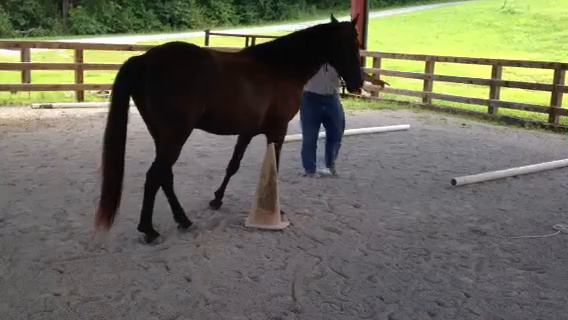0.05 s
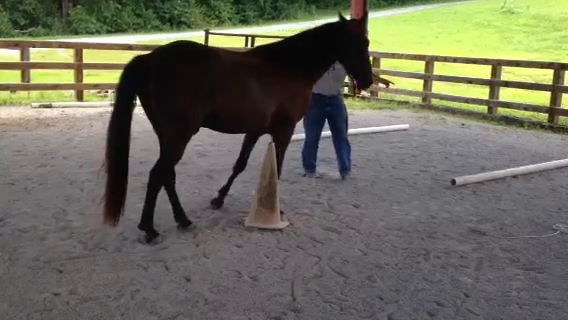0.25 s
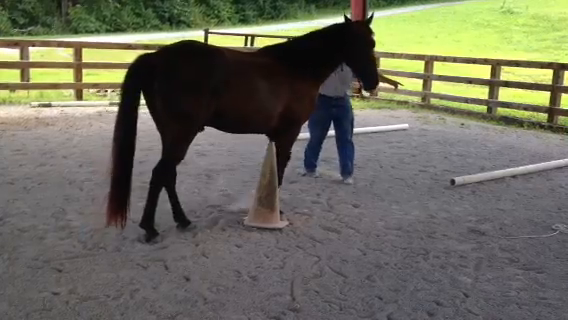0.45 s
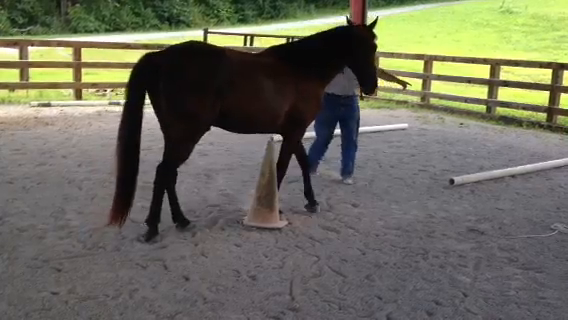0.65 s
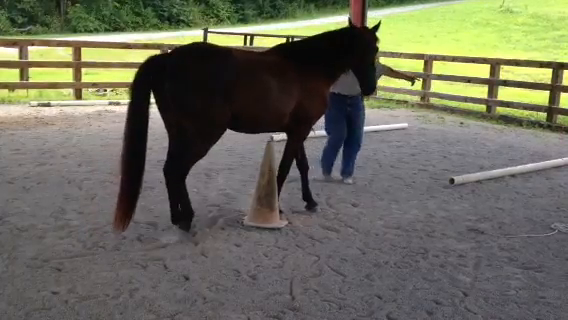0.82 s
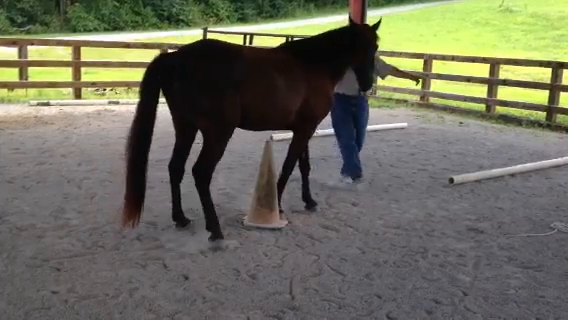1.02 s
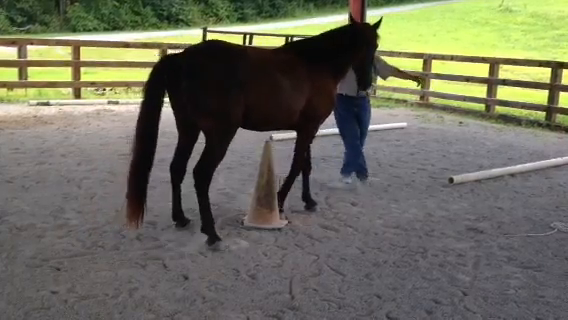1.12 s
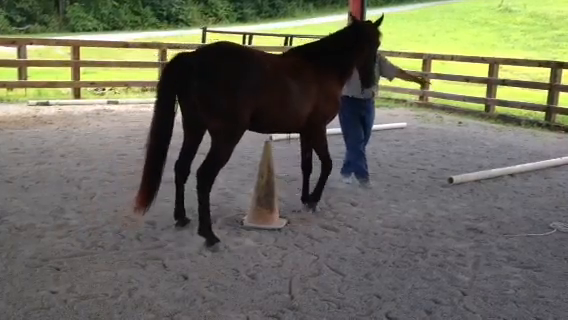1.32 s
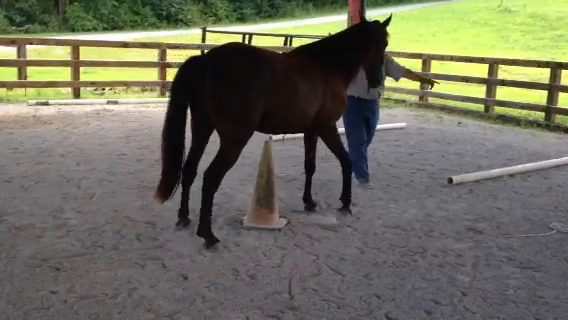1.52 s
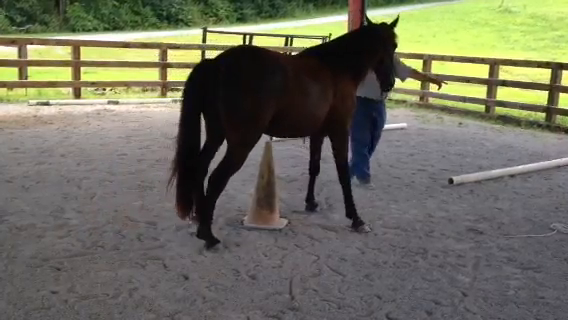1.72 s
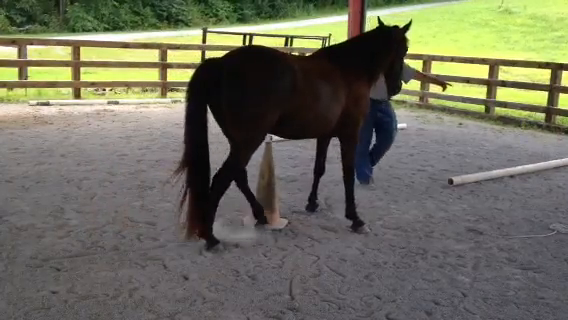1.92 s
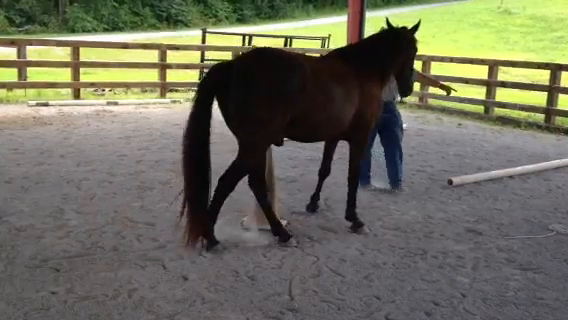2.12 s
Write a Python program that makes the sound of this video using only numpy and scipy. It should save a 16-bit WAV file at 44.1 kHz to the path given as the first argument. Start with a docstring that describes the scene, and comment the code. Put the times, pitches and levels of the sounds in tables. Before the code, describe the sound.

Muffled hoofsteps of a horse scuffing through sand, over a faint steady hiss.

```python
"""A horse walking on sand

In a covered outdoor arena, heard in mono from a few metres, each hoof scuffs the sand and throws
a spray of grains: many tiny impacts that merge into noise. Dull, heavily damped thuds come in
clusters with a low shudder between them, and bits of grit tick. Behind lie a steady high hiss,
a throbbing insect, a faint rumble and thin far whistles, likely birds."""
import sys
import numpy as np
from scipy import signal
from scipy.fft import rfft, irfft
from scipy.io import wavfile

SR = 44100
rng = np.random.default_rng(int(sys.argv[2]) if len(sys.argv) > 2 else 0)


def store_wav(level_fs):
    """Save 16-bit WAV to argv[1]."""
    pcm = np.round(np.clip(np.atleast_2d(level_fs), -1, 1) * 32767)
    wavfile.write(sys.argv[1], SR, pcm.T.astype(np.int16))


N = 94815
TIME = np.arange(N) / SR


def amp(db):
    """The decibel scale: 20 dB is a factor of ten in amplitude."""
    return 10 ** (np.asarray(db) / 20)


def coloured(x, spectrum):
    """Spectral shaping: filters x by (frequency [Hz], gain [dB]) points, then scales it to rms 1."""
    hz, db = np.transpose(spectrum)
    bin_hz = np.fft.rfftfreq(N, 1 / SR)
    gain = amp(np.interp(np.log(bin_hz + 1), np.log(hz + 1), db))
    shaped = irfft(rfft(x) * gain, N)
    return shaped / np.std(shaped)


def noise(spectrum):
    """Stationary Gaussian noise of the given spectrum, at rms 1."""
    return coloured(rng.standard_normal(N), spectrum)


def grains(per_s, spread_db):
    """Shot noise: independent tiny impacts, a few much larger than the rest."""
    size = amp(spread_db * np.minimum(rng.exponential(1, N), 4))
    return size * rng.choice([-1, 1], N) * (rng.random(N) < per_s / SR)


def patchy(x, depth_db, width_hz, length_s):
    """Random modulation: narrow patches of the spectrum swell and sink."""
    hz, t, spectra = signal.stft(x, SR, nperseg=1024, noverlap=768)
    field = rng.standard_normal(spectra.shape)
    for axis, step in enumerate([hz[1] / width_hz, t[1] / length_s]):
        smoothing = np.exp(-(2 * step * np.arange(-30, 31)) ** 2)
        field = np.apply_along_axis(np.convolve, axis, field, smoothing, "same")
    gain = amp(depth_db * field / field.std())
    return signal.istft(spectra * gain, SR, nperseg=1024, noverlap=768)[1][:N]


def strokes(rows):
    """Envelope of sand flow: each stroke swells, then decays as grains settle; their powers add."""
    power = np.zeros(N)
    for peak_s, db, rise_s, decay_s in rows:
        t = TIME - peak_s
        envelope = np.exp(-np.where(t < 0, (t / rise_s) ** 2, abs(t / decay_s)))
        power += (amp(db) * envelope) ** 2
    return np.sqrt(power)


def blows(rows, rise_s, steepness):
    """Damped oscillation: each blow drives a body whose vibration swells and quickly dies."""
    out = np.zeros(N)
    for peak_s, db, hz in rows:
        near = abs(TIME - peak_s) < 10 * rise_s
        t = TIME[near] - peak_s
        age = np.maximum(1 + t / rise_s, 0)  # 0 at the onset, 1 at the peak
        envelope = (age * np.exp(1 - age)) ** steepness
        out[near] -= amp(db) * envelope * np.cos(2 * np.pi * hz * t)
    return out


def hiss():
    """Broadband noise, strongest in the treble, whose level drifts slightly."""
    # hiss spectrum (frequency [Hz], relative density [dB])
    spectrum = [(600, -14.5), (2000, -7), (3100, -7.5), (3700, -4.5), (4150, -0.5), (4600, -0.5),
                (5100, 0.5), (5500, -1), (6100, 2), (6700, -2), (7300, -7.5), (8600, -14), (9600, -9),
                (10500, -15), (11100, -21), (12000, -15.5), (15300, -18)]
    # slow drift (time [s], gain [dB])
    swell = [(0, -.5), (.45, -1), (.85, 0.5), (1.4, 0.02), (2.15, 0)]
    return amp(-58 + np.interp(TIME, *np.transpose(swell))) * noise(spectrum)


def insect():
    """Amplitude modulation of a high noise band gives the throb of a far insect."""
    # band of the call (frequency [Hz], relative density [dB])
    spectrum = [(7500, -41.5), (9000, -13.5), (9600, 0.5), (10100, 0.5), (10550, -1), (10950, -14),
                (12500, -41)]
    throb_hz, depth_db = 6.3, 1
    return amp(-67.5 + depth_db * np.cos(2 * np.pi * throb_hz * TIME)) * noise(spectrum)


def rumble():
    """Ambient noise of the open air, with its energy at low frequencies."""
    # rumble spectrum (frequency [Hz], relative density [dB])
    spectrum = [(20, -2.5), (45, 6.5), (90, 4), (170, 1), (280, -9.5), (450, -18.5), (900, -21.5),
                (2500, -34), (8000, -55)]
    return amp(-59) * noise(spectrum)


def whistles():
    """Frequency modulation: far, birdlike tones glide and waver as they swell and fade."""
    # whistles (start [s], end [s], start pitch [Hz], end pitch [Hz], rms level [dB])
    calls = [(-.06, 0.172, 4290, 4162, -68.5), (0.122, 0.294, 4080, 4110, -70.5),
             (.24, .38, 4240, 4275, -75), (0.449, .74, 5130, 5000, -73), (1.785, 2.002, 3280, 3210, -71)]
    # spectrum of the wavering (modulation rate [Hz], relative density [dB])
    waver = [(5, 0.5), (30, 0.5), (120, -25.5), (1000, -80)]
    waver_rms_hz = 14.3
    out = np.zeros(N)
    for start, end, from_hz, to_hz, db in calls:
        progress = np.clip((TIME - start) / (end - start), 0, 1)
        hz = from_hz + (to_hz - from_hz) * progress + waver_rms_hz * noise(waver)
        envelope = 2 * amp(db) * np.sin(np.pi * progress)
        out += envelope * np.sin(2 * np.pi * np.cumsum(hz) / SR)
    return out


def shudder():
    """Gated low-frequency noise: an uneven trembling around the clusters of thuds."""
    # spells of trembling (start [s], end [s], rms level [dB])
    spells = [(.0, 0.098, -56), (0.113, 0.36, -45.5), (0.398, .58, -51), (0.617, 0.718, -52.5),
              (0.753, 0.86, -64), (1.076, 1.154, -42), (1.21, 1.359, -45.5), (1.51, 1.58, -62.5),
              (1.925, 2.154, -60)]
    # shudder spectrum (frequency [Hz], relative density [dB])
    spectrum = [(30, -27), (60, -1), (110, 1.5), (175, 5), (270, -10), (400, -18.5), (700, -29.5),
                (2000, -47)]
    fade_s = 0.037
    envelope = np.zeros(N)
    for start, end, db in spells:
        inside_s = np.minimum(TIME - start, end - TIME)
        envelope += amp(db) * np.clip(inside_s / fade_s + 0.5, 0, 1)
    return envelope * noise(spectrum)


def scuffs():
    """Granular friction: sand grinds under each hoof with a shifting colour."""
    # hoof strokes (peak time [s], rms level [dB], rise [s], decay time [s])
    hoof_strokes = [(.003, -53, 0.013, 0.074), (.158, -62, 0.0076, 0.035), (.29, -68.5, 0.036, 0.04),
                    (.368, -57, 0.02, 0.055), (.49, -62.5, 0.023, 0.04), (.674, -55, 0.012, .03),
                    (.695, -50, 0.0197, 0.0663), (.78, -58, 0.0224, 0.185), (1.064, -50.5, 0.0141, 0.018),
                    (1.12, -59.5, 0.0586, 0.17), (1.29, -59.5, 0.076, 0.19), (1.703, -52, 0.037, 0.1026),
                    (1.733, -54.5, 0.0098, 0.13), (1.921, -60.5, 0.0024, 0.0127),
                    (2.0895, -50.5, .0015, 0.034), (2.104, -47.5, 0.012, 0.07)]
    # spectrum of grinding sand (frequency [Hz], relative density [dB])
    spectrum = [(200, -3.5), (500, -6.5), (850, 1.5), (1100, -2), (1500, 1), (1850, -2), (2250, 0.4),
                (3000, -13), (4200, -12), (6200, -13), (8000, -20), (15000, -49)]
    grinding = coloured(grains(per_s=7000, spread_db=4.5), spectrum)
    return strokes(hoof_strokes) * patchy(grinding, depth_db=2, width_hz=128, length_s=0.097)


def sprays():
    """Shot noise of fine grains: thrown by the hooves, they scatter in bright bursts."""
    # throws of sand (peak time [s], rms level [dB], rise [s], decay time [s])
    throws = [(.003, -70.5, .01, 0.032), (.369, -63, .006, .012), (.42, -68, .015, 0.018),
              (.668, -60.5, 0.015, 0.017), (.693, -61, 0.0183, 0.0375), (.84, -70.5, 0.126, 0.108),
              (1.064, -60.5, .02, .022), (1.01, -68, .03, .1), (1.30, -69, 0.036, 0.3),
              (1.54, -70, 0.047, 0.044), (1.715, -63.5, 0.065, .06), (1.865, -65, 0.031, .035),
              (1.937, -64.5, 0.012, 0.057), (2.095, -54.5, 0.0062, 0.0134), (2.113, -55.5, .01, 0.0147)]
    # spectrum of fine grains (frequency [Hz], relative density [dB])
    spectrum = [(1000, -36), (3000, -16.5), (6000, -23), (8500, 7), (11500, 10), (13500, 5), (15300, 0)]
    return strokes(throws) * coloured(grains(per_s=8700, spread_db=4.5), spectrum)


def thuds():
    """Heavily damped impacts: dull thuds with a faint overtone, some with a harder knock."""
    # dull impacts (peak time [s], peak level [dB], pitch [Hz])
    dull = [(0.1181, -35, 161), (.131, -41.5, 158), (0.1601, -38.5, 236), (.1665, -42, 192),
            (.186, -47, 170), (0.2306, -29, 235.2), (.251, -41, 169), (.280, -42, 182),
            (.317, -30.5, 210.6), (0.335, -32.5, 172), (0.3567, -22, 173), (0.3677, -20, 206),
            (0.373, -25, 180), (0.423, -34.5, 162), (0.44, -38, 201), (.458, -42, 168), (.521, -31, 186),
            (.533, -34, 150), (0.5433, -39.5, 156), (.560, -37, 210), (0.65, -39, 211), (.664, -35, 237.6),
            (0.677, -34.5, 167), (0.77, -38.5, 191), (.839, -42, 147), (.851, -39, 150), (0.868, -52, 173),
            (1.075, -30, 190), (1.081, -25, 202), (1.098, -26.5, 174), (1.105, -29.5, 176),
            (1.121, -34.5, 198), (1.1277, -32.5, 178), (1.139, -29.5, 181.6), (1.162, -41.5, 225),
            (1.229, -32, 173.6), (1.288, -33, 145), (1.305, -42, 178), (1.336, -42, 185), (1.345, -35, 184),
            (1.702, -29, 171), (1.754, -46.5, 165), (1.812, -49, 174), (1.866, -38, 160), (1.946, -46, 178),
            (2.014, -44, 166), (2.111, -34, 178)]
    # harder impacts (peak time [s], peak level [dB], pitch [Hz])
    knocks = [(.160, -47, 427), (.2305, -48, 480), (.356, -30.5, 502), (.3637, -20, 435), (.368, -37, 530),
              (.439, -46, 400), (.515, -47.5, 377), (.664, -47, 400), (.769, -61, 540), (1.081, -37, 400),
              (1.088, -35.5, 417), (1.697, -43.5, 430)]
    overtone_hz, overtone_gain_db = 387.2, -27
    overtones = [(peak_s, db + overtone_gain_db, overtone_hz) for peak_s, db, _ in dull]
    return (blows(dull, rise_s=0.00607, steepness=5.12)
            + blows(overtones, rise_s=0.015, steepness=5.12)
            + blows(knocks, rise_s=0.0016, steepness=1.5))


def grit():
    """Impact transients: larger grains land with a bright tick that decays exponentially."""
    # landings (time [s], initial level [dB])
    ticks = [(.667, -49), (.681, -52), (1.456, -51), (1.729, -49.5), (1.8573, -48), (1.8671, -42.5),
             (2.114, -42)]
    # tick spectrum (frequency [Hz], relative density [dB])
    spectrum = [(2000, -20), (6000, -6.5), (8500, 1.5), (12000, 2), (15300, -3)]
    decay_s = 0.00055
    envelope = sum(amp(db) * (TIME >= s) * np.exp(-abs(TIME - s) / decay_s) for s, db in ticks)
    return envelope * noise(spectrum)


def scene():
    """Superposition: the horse and its surroundings add, the same in both channels."""
    horse = shudder() + scuffs() + sprays() + thuds() + grit()
    shimmer = patchy(hiss() + insect(), depth_db=1.3138, width_hz=170, length_s=0.038)
    mono = horse + shimmer + rumble() + whistles()
    return np.array([mono, mono])


def record(dry):
    """Band limiting: a small microphone loses the deep bass, and a low-pass cuts the top treble."""
    low_cut_hz, high_cut_hz = 88.5, 15300
    high_pass = signal.butter(2, low_cut_hz, "highpass", fs=SR, output="sos")
    low_pass = signal.firwin(1023, high_cut_hz, window=("kaiser", 9), fs=SR)
    thin = signal.sosfiltfilt(high_pass, dry, padtype="even")
    return signal.oaconvolve(thin, low_pass[None], "same")


dry = scene()
out = record(dry)
store_wav(out)
```